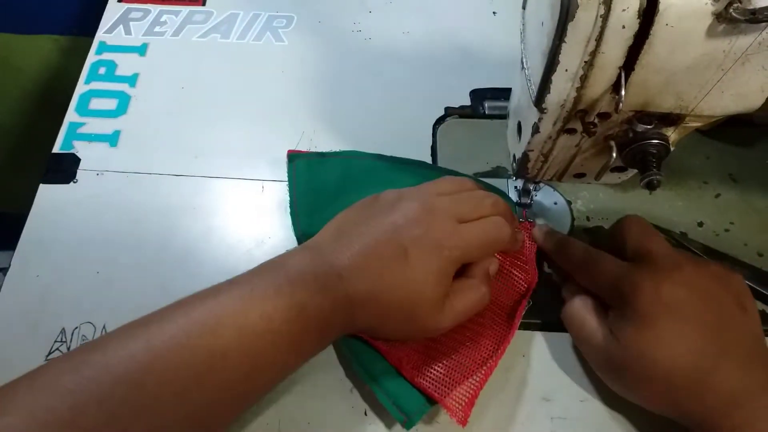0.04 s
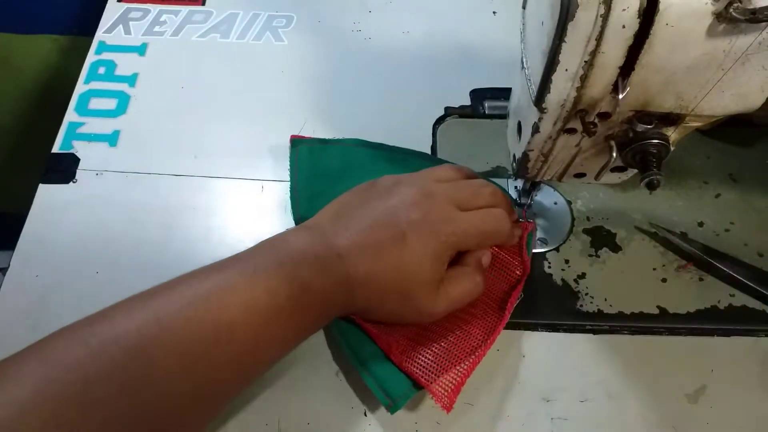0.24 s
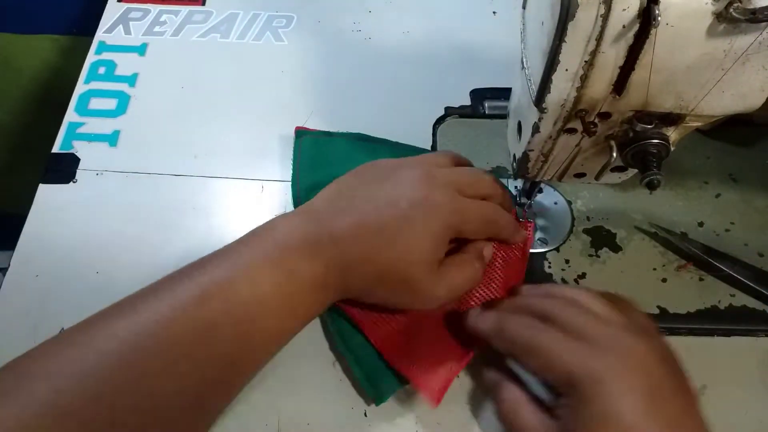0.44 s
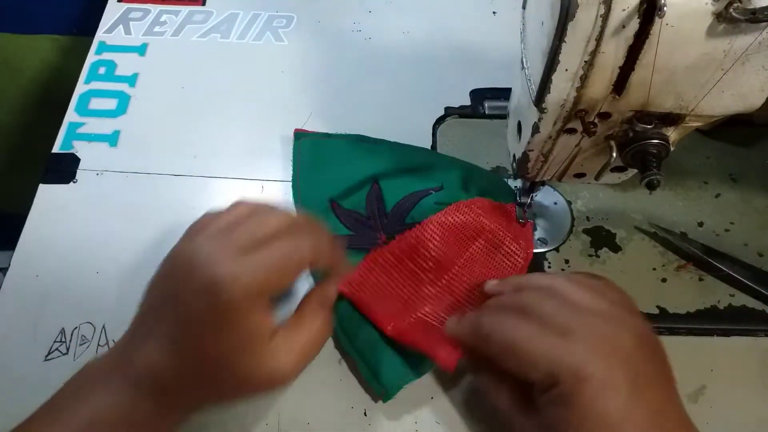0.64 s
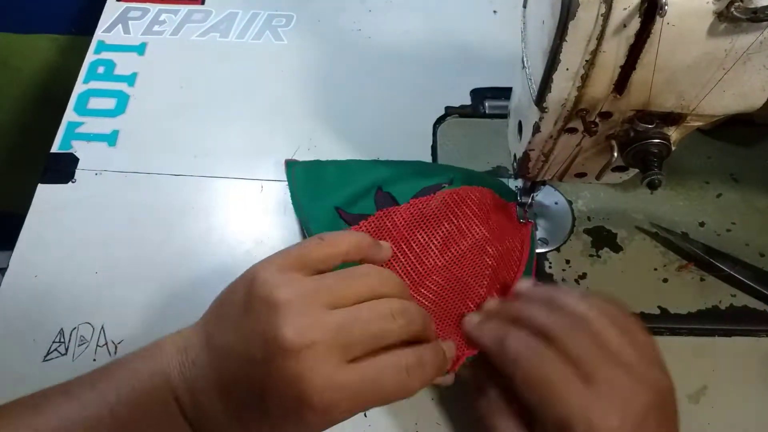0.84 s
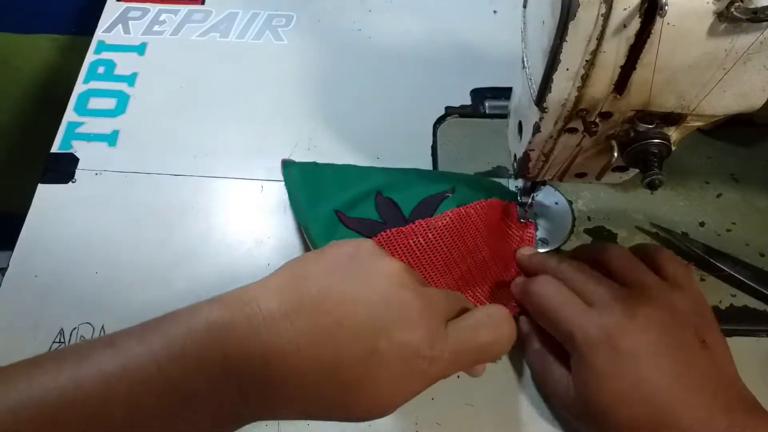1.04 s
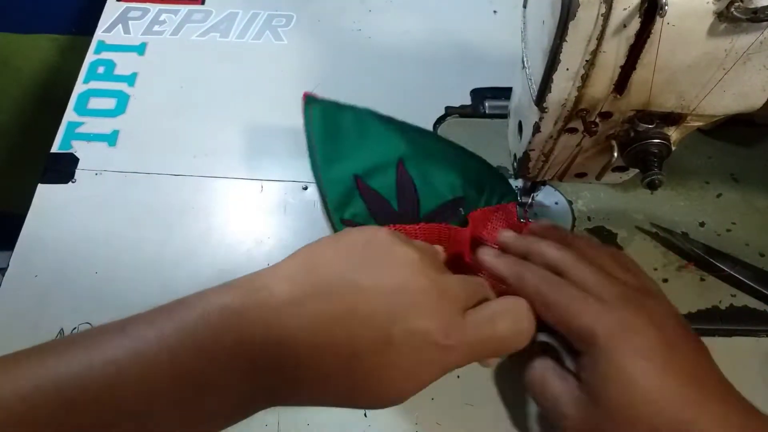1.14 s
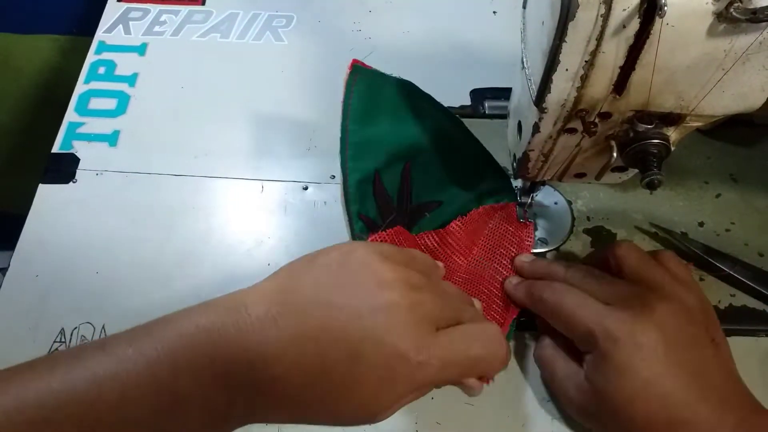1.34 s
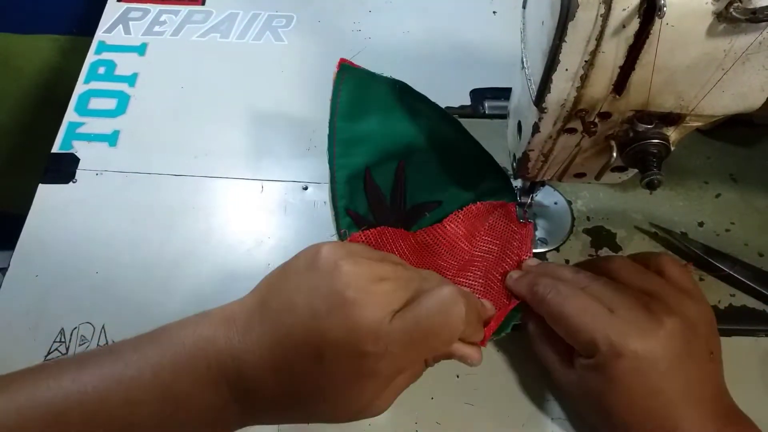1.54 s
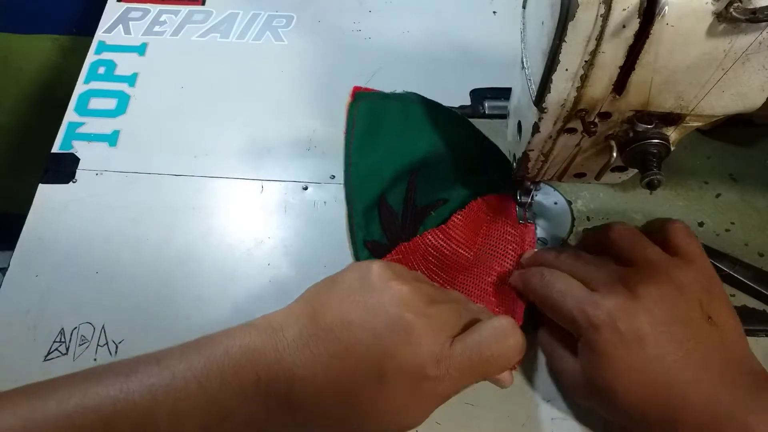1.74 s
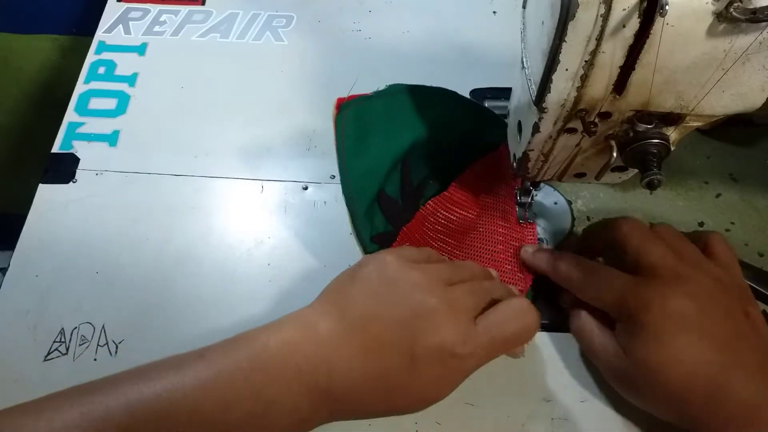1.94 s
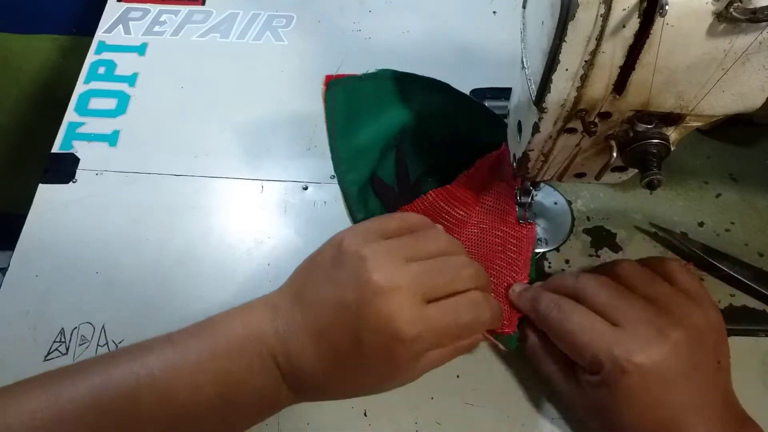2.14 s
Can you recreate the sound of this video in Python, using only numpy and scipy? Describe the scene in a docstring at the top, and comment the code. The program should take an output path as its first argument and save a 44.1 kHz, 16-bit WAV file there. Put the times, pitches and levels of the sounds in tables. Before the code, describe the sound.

An industrial sewing machine idles close by, with low motor rumble, thin whines slowly rising in level and a fast-fluttering airy hiss. At about 0.2 to 0.35 seconds it lurches with a loud woody thud, metallic clank and rattle; a shorter, weaker knock follows at 0.5. Mostly hum remains, with faint ticks near 0.67 and 1.15, until a softer rattling double stroke from 1.65 to 1.95.

```python
"""A sewing workshop: an industrial machine heard from close above its table.
The mechanism lurches in four strokes, the last two running together: table and metal bed swing as partly
noisy resonances, loose parts rattle as random clicks and noise, the stand jolts, and small parts tick, tap
and ring. The motor idles throughout: low rumble of shaped noise, fuzzy whines, and a resonant hiss that
throbs once per shaft turn."""
import sys
import numpy as np
from scipy import signal
from scipy.fft import rfft, irfft, next_fast_len
from scipy.io import wavfile
from scipy.ndimage import uniform_filter1d

SR = 44100
rng = np.random.default_rng(int(sys.argv[2]) if len(sys.argv) > 2 else 0)


def wrap_up_sound(samples):
    """Save the sound to the file named by the first command line argument, as 16-bit audio."""
    columns = np.atleast_2d(samples).T
    # keep every value between -1 and 1, then stretch to whole-number steps
    tamed = np.clip(columns, -1, 1)
    steps = np.round(tamed * 32767).astype(np.int16)
    wavfile.write(sys.argv[1], SR, steps)


N = 97020

# table swing, three curves, the last holding two strokes: start_s, level_db
TABLE_CURVES = [
    [(0.21, -50), (0.222, -50), (0.23, -29), (0.236, -30), (0.25, -42), (0.274, -18), (0.283, -32),
     (0.292, -19.5), (0.302, -21.5), (0.312, -30), (0.32, -51.5), (0.35, -53.0)],
    [(0.49, -51), (0.503, -43), (0.512, -32), (0.522, -36), (0.536, -26), (0.542, -28), (0.551, -41),
     (0.56, -33), (0.59, -53.0)],
    [(1.64, -55), (1.664, -41), (1.674, -47), (1.692, -37), (1.724, -48), (1.748, -41), (1.768, -48),
     (1.782, -43), (1.8, -48), (1.822, -41), (1.845, -47), (1.86, -41), (1.885, -42), (1.915, -35),
     (1.95, -50)],
]
# table resonance, one per curve: pitch_hz
TABLE_PITCHES_HZ = [174.3, 170.5, 181.5]
# metal bed ringing, three curves, the last holding two strokes: start_s, level_db, pitch_hz
BED_CURVES = [
    [(0.21, -45, 469), (0.246, -40, 472), (0.256, -30.2, 461), (0.27, -38.6, 445), (0.282, -29.1, 510),
     (0.292, -35.3, 526), (0.302, -33.4, 514), (0.308, -38.8, 487), (0.316, -54.6, 459), (0.33, -42.3, 403),
     (0.35, -55.0, 369)],
    [(0.49, -53, 492), (0.505, -36.5, 449), (0.518, -33.5, 460), (0.526, -40.2, 438), (0.536, -37.1, 441),
     (0.544, -38.9, 482), (0.558, -32.8, 449), (0.572, -36.6, 434), (0.59, -55.0, 370)],
    [(1.64, -55.0, 400), (1.664, -43, 440), (1.686, -47.5, 482), (1.692, -38.9, 491), (1.708, -41.3, 478),
     (1.738, -35, 480), (1.752, -37, 420), (1.774, -47, 484), (1.79, -43, 489), (1.803, -47, 430),
     (1.834, -40.0, 424), (1.852, -32.3, 459), (1.866, -34.5, 480), (1.876, -28.0, 473),
     (1.912, -36.2, 449), (1.92, -43.5, 433), (1.932, -42.9, 413), (1.945, -54, 415)],
]
# loose parts rattling, three curves, the last holding two strokes: start_s, level_db
LOOSE_CURVES = [
    [(0.21, -46), (0.254, -35.5), (0.284, -33.5), (0.306, -37), (0.318, -46), (0.324, -45), (0.346, -42),
     (0.35, -51)],
    [(0.49, -42.5), (0.536, -34.5), (0.546, -33.5), (0.562, -32), (0.574, -37.5), (0.584, -38), (0.59, -53)],
    [(1.64, -58), (1.676, -50), (1.698, -38.5), (1.718, -39), (1.728, -41.5), (1.744, -38), (1.8, -47),
     (1.816, -41), (1.848, -39.5), (1.88, -34), (1.914, -34.5), (1.922, -53), (1.93, -40), (1.95, -43)],
]
# relative spectrum of rattle and cracks: freq_hz, density_db_per_hz
RATTLE_SPECTRUM = [(350, -4.5), (600, -10), (953, -13.5), (1190, -10), (1740, -15.5), (2760, -8.5),
                   (4210, -14), (6330, -17.5), (9390, -29.5), (12300, -25.5), (15600, -35)]
# stand jolting under the table: start_s, length_s, level_db, pitch_hz
STAND_JOLTS = [(0.277, 0.042, -28, 107), (0.53, 0.032, -37.5, 107), (1.851, 0.028, -39, 100),
               (1.899, 0.03, -36, 115)]
# metal ticks: start_s, level_db, ring_hz, ring_t60_s
METAL_TICKS = [(.2818, -26, 6200, .018), (.5357, -28, 4840, .03), (1.155, -40, 1100, .015),
               (1.716, -40, 2730, .025), (1.741, -38, 2740, .05), (1.8749, -36, 3070, .04),
               (1.903, -34, 4400, .04)]
# brief taps, ticks, rings and squeaks of small parts: start_s, length_s, level_db, pitch_hz
SMALL_SOUNDS = [(.095, .006, -45, 4940), (.294, .017, -36.5, 1070), (.322, .008, -42, 2950),
                (.334, .015, -42, 2950), (.332, .014, -48, 4450), (.508, .014, -44, 1080),
                (.576, .014, -45, 4450), (.6735, .005, -38.5, 670), (1.705, .005, -42, 13000)]
# casing resonances stirred by the motor: pitch_hz, width_hz, level_db
CASING_MODES = [(78.3, 33.95, -52.5), (120.7, 38.6, -52.5), (194.6, 24.06, -52.5), (288, 31.8, -56.5),
                (379.3, 56.2, -56.5), (1976, 66.5, -61.5), (3486, 88, -58.5), (3795, 145, -59)]
# thin motor whines, level at mid-scene: pitch_hz, width_hz, level_db
THIN_WHINES = [(1595.5, 23.5, -59), (2852, 40.7, -62)]
# bearing hiss resonances: pitch_hz, width_hz, level_db
HISS_MODES = [(6280, 150, -63), (6770, 41, -57.5), (7020, 55, -54.5), (7355, 510, -47.5),
              (7770, 150, -57.5), (8105, 240, -53)]
# relative spectrum of motor rumble and air: freq_hz, density_db_per_hz
IDLE_SPECTRUM = [(15, -61), (25, -11), (110, -2.5), (246, -10), (389, -5.5), (850, -18), (1420, -14.5),
                 (1580, -10.5), (1710, -17), (2430, -19), (2780, -13.5), (5020, -16.5), (7120, -9),
                 (9080, -22.5), (15600, -25)]
# stereo side relative to mid: freq_hz, level_db
SIDE_SPECTRUM = [(5000, -76), (8000, -59.5), (10000, -39), (11500, -5.5), (15000, -5)]

TABLE_ROUGH, BED_ROUGH = 0.38, 0.6  # noise share as amplitude, 0 to 1
RATTLES_PER_S = 2700
SHAFT_HZ, THROB_DEPTH, THROB_START_TURNS = 43.2, 0.3, 0.14
WHINE_RISE_DB = 5  # start to end
IDLE_DB = -43
EDGE_HZ = 15740


def amp(db):
    """Decibels to gain."""
    return 10 ** (np.asarray(db) / 20)


def evened(x):
    """Scales to rms 1."""
    return x / np.sqrt(np.mean(x ** 2) + 1e-20)


def read(points, hz):
    """Reads a spectrum in dB, interpolated over log frequency."""
    f, value = np.transpose(points)
    return np.interp(np.log(hz + 1), np.log(f + 1), value)


def add(mix, start_s, sound):
    """Adds a sound in place, cut at the end of the mix."""
    part = mix[round(start_s * SR):][:len(sound)]
    part += sound[:len(part)]


def colour(x, points):
    """Shapes a sound by a spectrum."""
    size = next_fast_len(len(x) + 512)
    gain = amp(read(points, np.fft.rfftfreq(size, 1 / SR)))
    return irfft(rfft(x, size) * gain, size)[:len(x)]


def resonate(x, hz, width_hz):
    """One-pole resonance: shifts hz down to zero, smooths, shifts back."""
    turn = np.exp(2j * np.pi * np.cumsum(hz * np.ones(len(x))) / SR)
    r = np.exp(-np.pi * width_hz / SR)
    smooth = signal.lfilter([1 - r], [1, -r], x / turn + 1e-18)
    return 2 * (turn * smooth).real


def shake(hz, rough, width_hz):
    """A body swinging at its resonance, partly steady and partly jolted at random; rms near 1."""
    swing = np.sqrt(2) * np.sin(2 * np.pi * np.cumsum(hz) / SR)
    noise = rng.standard_normal(len(hz))
    jolts = resonate(resonate(noise, hz, width_hz), hz, width_hz)
    return np.sqrt(1 - rough ** 2) * swing + rough * evened(jolts)


def unroll(rows):
    """A curve's columns, sample by sample, the level as a gain with soft ends."""
    s, db, *rest = np.transpose(rows)
    t = np.arange(s[0], s[-1], 1 / SR)
    level = amp(np.interp(t, s, db)) * signal.windows.tukey(len(t), 0.15)
    return [level] + [np.interp(t, s, col) for col in rest]


def table(rows, hz):
    """The table thudding through one curve; its swing beats, turning over at each dip in level."""
    level, = unroll(rows)
    s, db = np.transpose(rows)
    dips_s = s[signal.argrelmin(db)[0]] - s[0]
    turnovers = np.searchsorted(dips_s, np.arange(len(level)) / SR)
    way = uniform_filter1d((-1.) ** turnovers, size=180)  # smooth sign flips
    return s[0], way * level * shake(hz + 0 * level, TABLE_ROUGH, 90)


def bed(rows):
    """The metal bed ringing through one curve, its pitch moving along it."""
    level, hz = unroll(rows)
    return rows[0][0], level * shake(hz, BED_ROUGH, 250)


def rattle(rows):
    """Loose parts: dense random clicks of either sign plus scraping noise."""
    level, = unroll(rows)
    size_db = 3.5 * np.minimum(rng.exponential(1, len(level)), 3.5)
    size = amp(size_db) * rng.choice([-1, 1], len(level))
    clicks = (rng.random(len(level)) < RATTLES_PER_S / SR) * size
    scrape = 0.76 * rng.standard_normal(len(level))
    return rows[0][0], level * evened(colour(evened(clicks) + scrape, RATTLE_SPECTRUM))


def jolt(start_s, length_s, db, hz):
    """The stand's dull low push: a brief, partly noisy resonance with soft ends."""
    t = np.arange(0, length_s, 1 / SR)
    return start_s, amp(db) * signal.windows.tukey(len(t), 0.7) * shake(hz + 0 * t, 0.59, 60)


def tick(start_s, db, hz, t60_s):
    """Metal tick: a short broadband crack and a fuzzy decaying ring."""
    t = np.arange(0, 0.08, 1 / SR)
    crack = evened(colour(rng.standard_normal(len(t)), RATTLE_SPECTRUM)) * amp(-60 * t / 0.03)
    ring = shake(hz + 0 * t, 1.0, hz * 0.12) * amp(-60 * t / t60_s)
    attack = np.minimum(t / 0.0012, 1)
    return start_s, amp(db) * attack * (crack + ring)


def small_sound(start_s, length_s, db, hz):
    """Brief tap, tick, ring or squeak of a small part: a short tone mixed with narrow noise."""
    t = np.arange(0, length_s, 1 / SR)
    return start_s, amp(db) * signal.windows.tukey(len(t), 0.4) * shake(hz + 0 * t, 0.7, hz * 0.2)


def mechanism():
    """All strokes and small sounds, with the deep bass removed."""
    out = np.zeros(N)
    for source, rows in ((tick, METAL_TICKS), (small_sound, SMALL_SOUNDS), (jolt, STAND_JOLTS)):
        for row in rows:
            add(out, *source(*row))
    for swing, hz, ring, loose in zip(TABLE_CURVES, TABLE_PITCHES_HZ, BED_CURVES, LOOSE_CURVES):
        add(out, *table(swing, hz))
        add(out, *bed(ring))
        add(out, *rattle(loose))
    return signal.sosfilt(signal.butter(2, 70, "high", fs=SR, output="sos"), out)


def motor():
    """The idling motor: rumble, casing and thin whines, and a hiss pulsing with the shaft."""
    turns = SHAFT_HZ * np.arange(N) / SR + THROB_START_TURNS
    throb = 1 + THROB_DEPTH * np.sin(2 * np.pi * turns)
    rise = amp(WHINE_RISE_DB * np.linspace(-0.5, 0.5, N))
    casing = whines(CASING_MODES, 2.2, 0.71)
    thin = rise * whines(THIN_WHINES, 2.4, 0.6)
    hiss = throb * whines(HISS_MODES, 0.72, 0.92)
    return rumble() + casing + thin + hiss


def drift(seconds):
    """Slow random wander of rms 1."""
    size = round(seconds * SR)
    return evened(uniform_filter1d(uniform_filter1d(rng.standard_normal(N), size), size))


def whines(modes, waver_db, rough):
    """Narrow resonances, partly wandering tone and partly noise, each swelling on its own."""
    out = np.zeros(N)
    for hz, width_hz, db in modes:
        level = amp(db + waver_db * drift(0.022))
        pitch_hz = hz + 0.25 * width_hz * drift(0.04055)
        # two poles in series narrow the band, so each is made wider
        out += level * shake(pitch_hz, rough, width_hz * 1.52)
    return out


def rumble():
    """Broad motor and room noise whose level drifts in patches of time and frequency."""
    frames = N // 128 + 5
    a, b, patches = rng.standard_normal((frames, 257, 3)).T
    patches = evened(uniform_filter1d(uniform_filter1d(patches, 6, 0), 18, 1))
    grid = (a + 1j * b) * amp(1.87 * patches)
    x = signal.istft(grid, nperseg=512, noverlap=384)[1][:N]
    return amp(IDLE_DB) * evened(colour(x, IDLE_SPECTRUM))


def side_of(mid):
    """Stereo width: the mid with random phases, mostly in the treble."""
    hz, _, z = signal.stft(mid, SR, nperseg=256)
    phases = np.exp(2j * np.pi * rng.random(z.shape))
    z = abs(z) * phases * amp(read(SIDE_SPECTRUM, hz))[:, None]
    return signal.istft(z, SR, nperseg=256)[1][:N]


def scene():
    """Mechanism over motor, spread to left and right."""
    mid = mechanism() + motor()
    side = side_of(mid)
    return np.array([mid + side, mid - side])


def record(dry):
    """The band limit: a steep low-pass at EDGE_HZ."""
    edge = signal.firwin(1023, EDGE_HZ, window=("kaiser", 9), fs=SR)
    return signal.oaconvolve(dry, edge[None], "same")


dry = scene()
out = record(dry)
wrap_up_sound(out)
```